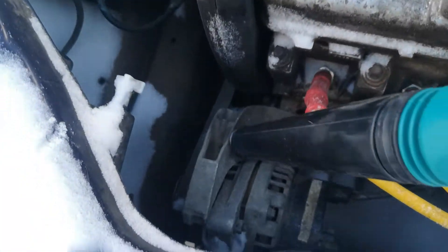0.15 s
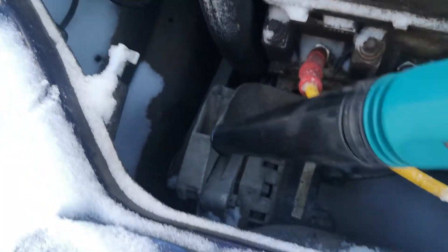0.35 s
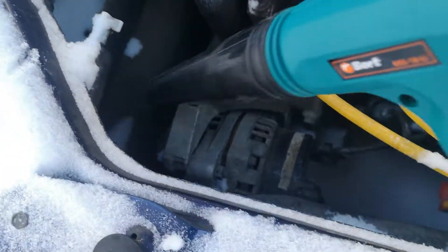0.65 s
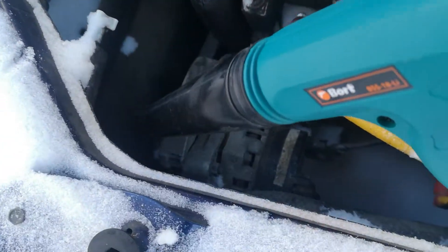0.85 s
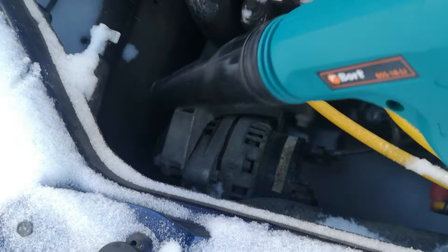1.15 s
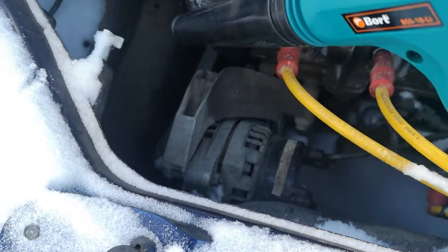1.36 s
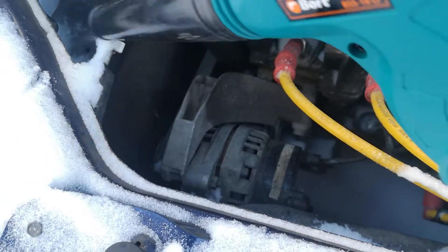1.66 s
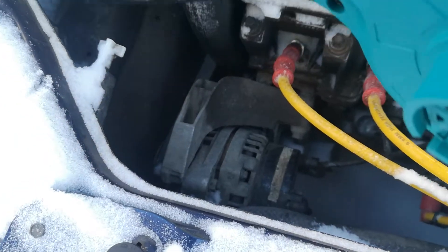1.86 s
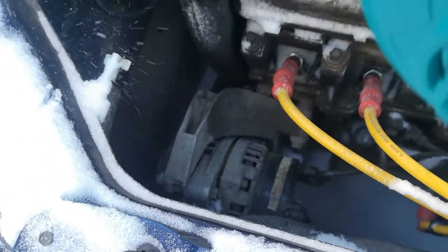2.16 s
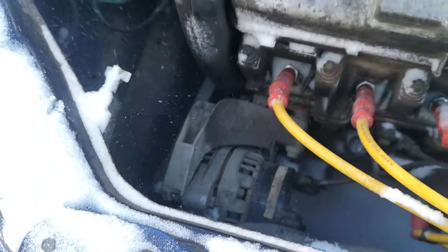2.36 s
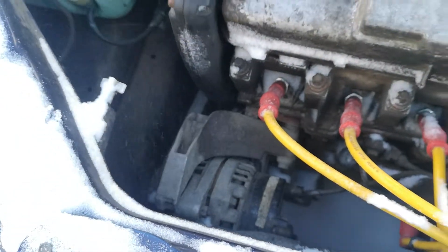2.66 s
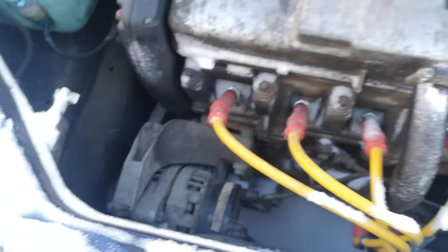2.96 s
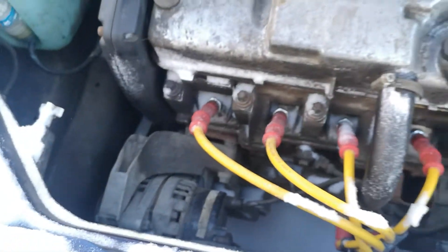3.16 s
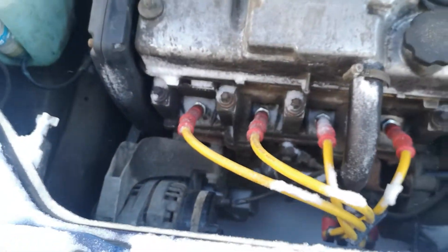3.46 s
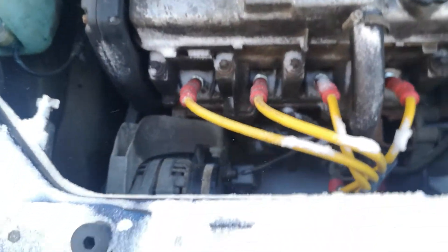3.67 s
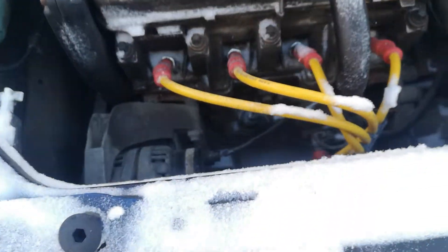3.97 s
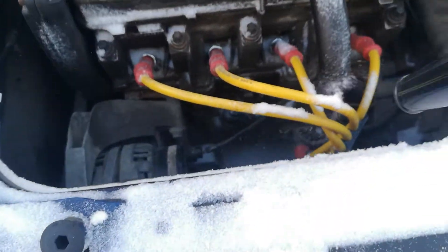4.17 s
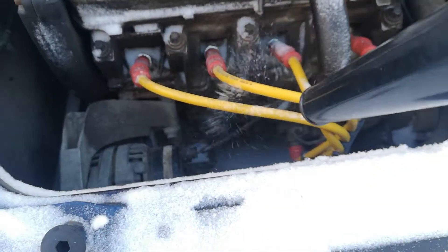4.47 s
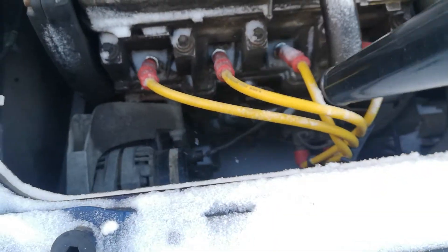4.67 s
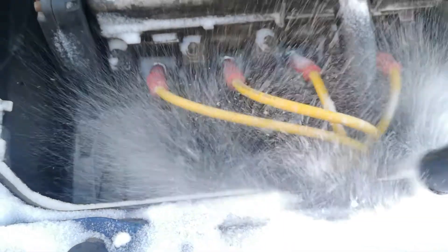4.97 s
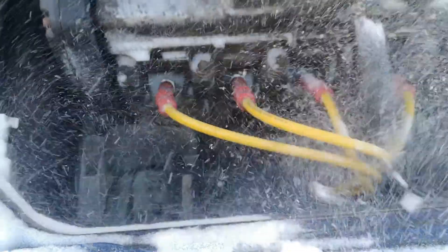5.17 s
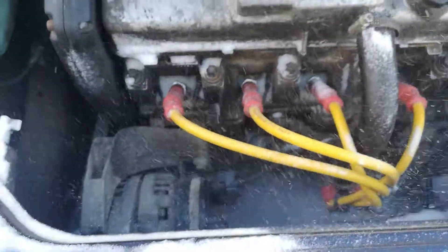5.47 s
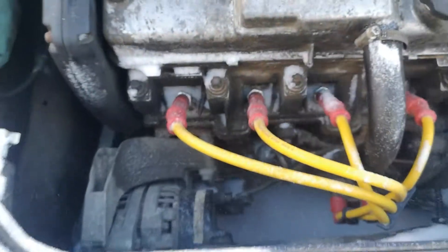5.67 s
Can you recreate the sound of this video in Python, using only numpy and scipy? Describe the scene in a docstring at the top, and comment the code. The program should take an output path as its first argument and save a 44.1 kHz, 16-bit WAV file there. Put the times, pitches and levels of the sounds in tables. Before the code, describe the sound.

A cordless handheld blower roars close up over a snowy engine bay, motor whine steady around loud hissing air, then sinks in pitch as it is released.

```python
"""Cordless blower over an engine bay

A nine-blade blower is swept over a snowy engine bay, close to a stereo microphone pair.
Sines at multiples of the shaft rate make hum and blade whine; coloured noise makes the air's roar and hiss.
A gap in the jet's way sounds hollow and briefly whistles; stray air buffets the microphones.
Near the end the trigger is let go: friction and air drag run the fan down, its whine ringing tube resonances."""
import sys
import numpy as np
from scipy import signal
from scipy.fft import rfft, irfft, next_fast_len
from scipy.io import wavfile

SR = 44100
rng = np.random.default_rng(int(sys.argv[2]) if len(sys.argv) > 2 else 0)


def inscribe(sig):
    """Save sig as 16-bit PCM at rate SR to the path in sys.argv[1].

    A 1-D sig is mono; a 2-D sig holds one channel per row.
    Samples are clipped to [-1, 1] before scaling.
    """
    pcm = np.round(np.clip(np.atleast_2d(sig).T, -1, 1) * 32767)
    wavfile.write(sys.argv[1], SR, pcm.astype(np.int16))


N = 257544

BLADES, FULL_SPEED_REV_S = 9, 277
RELEASE_S, FRICTION_PER_S, AIR_DRAG_PER_REV = 4.985, .3, .00143
# dB lost per tenfold drop in speed; AIR for housing and bright hiss
HUM_FALL_DB, ORDER_FALL_DB, AIR_FALL_DB = 135, 60, 39
WHINE_WIDTH_HZ = 60  # resonance width of the steady whine
HANDOVER_HZ = 25  # fall in pitch over which the tube resonances take over
LEFT_LAG_S, CUTOFF_HZ = .000533, 15150
ECHO_BAND_HZ = [1100, 4500]  # longer waves pass round the obstacles, shorter ones scatter
AIR_TRIM_DB = -0.52  # on the airflow and its reflections

# Balance is left-right; lag is of the left side. Airflow levels are before AIR_TRIM_DB and reflections.
# Microphone pair: f/Hz, likeness/0-1, balance/dB, lag beyond LEFT_LAG_S/rad
PAIR = [(30, 1, 0, -0.043), (151, 0.95, -0.3, -0.34), (337, 0.87, 1, 0.68), (607, 0.83, -6.5, 0.96),
        (850, 0.9, -6.5, 0.45), (1200, 0.49, -1, -0.8), (1750, 0.67, -1.5, 0.091), (2707, 1, -1.5, -0.11),
        (3030, 0.86, 6, -0.3), (5050, 0.5, -2, 0.23), (5760, 0, 1, -1.3), (6960, 0.59, 1, -2.06),
        (8200, 0.97, -1, -1.7), (9240, 0.26, 5.5, -1.56), (12000, 0.35, 3.5, -0.89)]
# Sweep of the blower: t/s, bearing as balance/dB, jet strength/dB, housing roar/dB, bright hiss/dB
SWEEP = [(0, -7.5, 4, -18, -27.5), (.45, -4, 0, -19, -25.5), (.75, -7, -1, -17, -22.5),
         (1.2, -8, -1, -17, -25), (1.6, -5.5, 0.5, -19.5, -25), (1.95, -11.5, 1.5, -19.5, -25.5),
         (2.3, -15, 2, -18.5, -24.5), (2.65, -8.5, 0.5, -18, -22.5), (2.9, -4.5, 1, -21, -23.5),
         (3.12, -0.5, -1.5, -18.5, -20), (3.36, -2, -1.5, -17.5, -18), (3.62, -8, 0, -22, -20),
         (3.84, 4.5, -1.5, -16.5, -22), (4.08, 6.5, -1, -17, -20.5), (4.6, 6.5, 0.5, -16, -23),
         (5, 1, 2.5, -16.5, -25.5), (5.2, 0, 2, -14.5, -26.5), (5.5, -0.5, 0.5, -14.5, -24.5),
         (5.84, -12, 0, -21, -28.5)]
# Shaft hum at full speed: t/s, level/dB
HUM = [(0, -30.5), (2.5, -30.5), (4, -28.5), (5, -28.5), (5.35, -23), (5.5, -29), (5.84, -30)]
# Blade whine at full speed: t/s, level/dB, balance/dB, lag/rad
WHINE = [(0, -30, 0, 3), (.25, -30, -6, 2.3), (.55, -26, -3, 2.5), (.72, -30, -2, 2.1), (.9, -25, -8, 1.9),
         (1.15, -27, -9, 1.7), (1.3, -24, -8, 1.7), (1.62, -22, -9, 1.8), (1.8, -27, -5, 2),
         (2.05, -30, -3, 3), (2.2, -24.5, -12, 2.3), (2.35, -28, -14, 2.4), (2.55, -26, -20, 1.5),
         (2.85, -26.5, -10, 2.5), (3.1, -28, -12, 2.9), (3.55, -28.5, -7, 2.8), (3.7, -35, -4, 2.5),
         (4.0, -25, 8, 2.1), (4.13, -24, 9, 2.8), (4.3, -25.5, 3, 3.14), (4.45, -27, 1, 3.14),
         (4.8, -23.5, 3, 3.14), (4.97, -22.5, 8, 4.8)]
# Tube resonances rung by the sinking whine: f/Hz, width/Hz, level/dB, balance/dB, lag/rad
TUBE = [(2455, 50, -21, 12, .7), (2345, 50, -17.5, 4, -.5), (2295, 35, -25, 1, -.7),
        (2160, 40, -21, -5, .8), (2105, 95, -20.5, -1, .4), (1965, 60, -21.5, 7, -.1),
        (1890, 70, -14.8, -1.5, -.5), (1790, 70, -27.5, -8, -.7), (1675, 70, -25, 2, -1.2),
        (1610, 48, -16.5, -11, -.8), (1545, 80, -31.5, 1, -1.3)]
# Fainter rotor and motor tones: multiple of shaft rate/1, level at full speed/dB, balance/dB
ORDERS = [(2, -40.5, -6), (3, -42, -7), (4, -42.5, -3), (8, -39.5, -1), (10, -35.5, -1), (15, -47, -1),
          (18, -40, -2), (27, -46, -4)]

# Noise spectra, relative: f/Hz, level per Hz/dB
RUSH_SPECTRUM = [(120, -21), (220, -8.5), (350, -5.5), (550, 0.5), (700, -2), (850, -0.5), (1050, 0),
                 (1300, -8), (1450, -5), (1700, -20)]
HISS_SPECTRUM = [(2700, 2), (3100, 5), (3400, 4), (3800, 4), (4200, -0.5), (5100, -12.5), (6400, -3),
                 (7000, -4), (7600, -36)]
TOP_SPECTRUM = [(8500, 8), (9300, 7), (10000, -1), (10500, -0.5), (11500, -5), (12500, -4.5),
                (15000, -12.5), (16000, -18)]
BUFFET_SPECTRUM = [(15, 7), (25, -0.5), (45, 3), (70, -5), (100, -4.5)]
FLUTTER_SPECTRUM = [(80, -6), (120, -1.5), (200, -1.5), (350, 1), (420, -5)]
# Noise resonances, relative: f/Hz, width/Hz, level/dB
LOWER_GAP_MODES = [(1135, 90, -3), (1235, 100, 0)]
UPPER_GAP_MODES = [(1355, 110, 0), (1445, 110, -3)]
EDGE_MODES = [(1616, 300, -0.5)]
METAL_MODES = [(1970, 540, 0.24), (2048, 340, 0.0032), (2230, 160, -1.3)]
HOUSING_MODES = [(2475, 320, -1.7), (2664, 740, 0.5), (2738, 305, 1.4)]
LOW_RING_MODES = [(4498, 440, 4), (4850, 250, -1)]
HIGH_RING_MODES = [(5515, 1380, 3), (5800, 210, -4)]
BRIGHT_MODES = [(7360, 1450, 2), (7470, 400, 0.5), (7803, 470, 2.5)]
UPPER_BRIGHT_MODES = [(8410, 730, 0), (8750, 500, -2)]

# Air parts that follow the jet: level/dB, share of jet swing/1, share of bright-hiss swing/1,
# loss per tenfold drop in speed/dB, balance/dB, share of bearing/1
RUSH_PART = (-26.5, 1, 0.5, 11, -1, -0.07)
METAL_PART = (-23.5, 0.52, 0.34, 24, 2, 0.43)
HISS_PART = (-24, 1.3, 0.18, 34, -4.5, 0.35)
TOP_PART = (-32, 1.5, 0.9, 24, -2, 0.17)
# Jet across a gap: t/s, lower resonance level/dB, upper resonance level/dB
HOLLOW = [(0, -27, -26), (.18, -25, -25.5), (.33, -27, -23), (.4, -28, -25), (.52, -31, -24),
          (.63, -35, -26), (.71, -44, -45), (1.3, -42, -60), (1.6, -35, -60), (2.2, -33, -60),
          (2.6, -42, -60), (3, -34, -60), (3.5, -33, -60), (3.8, -44, -60), (4.8, -42, -60), (5, -37, -60),
          (5.2, -42, -60), (5.84, -44, -60)]
# Low edge of the roar: t/s, level/dB, balance/dB
EDGE = [(0, -22.5, 12), (.5, -23, 6), (.72, -30.5, 9), (1.45, -29.5, 3), (1.7, -25, -3), (2.4, -29, -16),
        (2.65, -21.5, -13), (2.9, -27.5, 6), (3.3, -25, -4), (3.6, -22.5, -5), (3.85, -34, -14),
        (4.8, -32, -30), (5.3, -42, -6), (5.84, -34, 5)]
# Two ringing bands in the hiss: t/s, low level/dB, low balance/dB, high level/dB, high balance/dB
RINGS = [(0, -24, -3, -26, -1), (.5, -30, -6, -27, -0.5), (1.15, -32.5, -7, -27.5, -6),
         (1.45, -27.5, -7, -25, 1), (1.9, -26.5, -11, -27.5, -2), (2.25, -25.5, -3, -24, -7),
         (2.5, -32, 7, -28, -6), (2.9, -27.5, -1, -25, 1), (3.4, -28, 13, -23.5, -4),
         (3.85, -34, -10, -24, -6), (4.1, -26, -5, -28, 2), (4.4, -28.5, -1, -27, 1),
         (4.85, -30, 2, -25, 1), (5.1, -28, 4, -24.5, -3), (5.5, -30.5, -2, -33.5, -2),
         (5.84, -39.5, -16, -37, -7)]
# Bright hiss: t/s, balance/dB
BRIGHT_PAN = [(0, -6), (.65, 1), (1, -5), (1.5, -3), (2.1, -6.5), (2.6, -7), (3.2, 1), (3.45, -6),
              (3.7, -8), (4.1, -3), (4.45, -8), (4.75, -4), (5.2, 1), (5.84, -9)]
# Top of the bright hiss: t/s, level/dB, balance/dB
UPPER_BRIGHT = [(0, -30, 0), (.6, -34, -3), (1.5, -34, -8), (2.2, -35, -11), (2.68, -31, -8), (2.9, -34, 0),
                (3.03, -28, -5), (3.12, -33, 0), (3.27, -34, 6), (3.6, -36, 0), (3.87, -34, -7),
                (4, -25, 0), (4.4, -27.5, -3), (5, -30.5, 0), (5.3, -32, 0), (5.84, -44, 0)]
# Reflections in nozzle tube and off bay walls: delay/s, level/dB, spread of delay drift/s
ECHOES = [(.00431, -12, .00003), (.0087, -16, .0001), (.0017, -15, .0001)]
# Buffeting of the microphones: t/s, deep thump level/dB, faster flutter level/dB
BUFFETING = [(0, -39.5, -49), (.5, -43.5, -42.5), (1.1, -44, -36.5), (1.9, -43, -40), (2.65, -43, -36.5),
             (2.9, -43, -41), (3.4, -41, -31.5), (3.85, -45, -41.5), (4.08, -41, -36.5), (4.35, -46, -45),
             (4.85, -49, -44), (5.05, -41, -38.5), (5.4, -38, -34), (5.84, -40, -35)]
# Whistle of the gap: t/s, f/Hz, level/dB
WHISTLE = [(0, 1375, -70), (.385, 1375, -45), (.415, 1372, -18.5), (.445, 1368, -18), (.465, 1370, -28),
           (.49, 1380, -24), (.53, 1335, -26), (.58, 1325, -34), (.66, 1325, -60)]


def from_db(db):
    """Decibels to gain."""
    return np.exp(np.asarray(db) * np.log(10) / 20)


def rms_one(x):
    """Scale to rms 1 over all samples."""
    return x / np.sqrt(np.mean(x ** 2) + 1e-20)


def in_time(rows):
    """Table columns as curves, one value a sample."""
    t_s, *columns = np.transpose(rows)
    return [np.interp(np.arange(N) / SR, t_s, column) for column in columns]


def at_hz(rows, hz):
    """Table columns read on a log-frequency axis."""
    table_hz, *columns = np.transpose(rows)
    return [np.interp(np.log(hz + 1e-9), np.log(table_hz), column) for column in columns]


def drift(rate_hz):
    """Slow chance of spread 1: noise through two one-pole low-passes, run every 40th sample."""
    step = 40
    pole = np.exp(-2 * np.pi * rate_hz * step / SR)
    noise = rng.standard_normal(N // step + 2002)
    slow = signal.lfilter([1], [1, -2 * pole, pole * pole], noise)[2000:]  # settled part
    return np.interp(np.arange(N) / step, np.arange(len(slow)), rms_one(slow))


def placed(level_db, pan_db):
    """Left and right gains of a mean level and a left-right balance."""
    ratio = from_db(pan_db)
    right = from_db(level_db) * np.sqrt(2 / (1 + ratio ** 2))
    return np.array([ratio * right, right])


def left_lag_rad(hz):
    """Phase by which the left side hears a frequency late."""
    return 2 * np.pi * hz * LEFT_LAG_S + at_hz(PAIR, hz)[2]


# The pair's response per FFT bin
SIZE = next_fast_len(N)
BINS_HZ = np.arange(SIZE // 2 + 1) * SR / SIZE
ALIKE = np.clip(at_hz(PAIR, BINS_HZ)[0], 0, 1)
TILT = placed(0, at_hz(PAIR, BINS_HZ)[1])
LATE = np.exp(-1j * left_lag_rad(BINS_HZ))


def sloped(spectrum):
    """Gain per bin of a spectrum that is closed at both ends."""
    inside = (BINS_HZ > spectrum[0][0]) & (BINS_HZ < spectrum[-1][0])
    return from_db(at_hz(spectrum, BINS_HZ)[0]) * inside


def resonant(modes):
    """Gain per bin of noise sent twice through each resonance; powers add."""
    power = 0
    for centre_hz, width_hz, db in modes:
        detuning = 2 * (BINS_HZ - centre_hz) / width_hz
        power = power + (from_db(db) / (1 + detuning ** 2)) ** 2
    return np.sqrt(power)


def air(gain, gusts, flicker_db, lead_rad=0):
    """Turbulent noise, partly alike at the pair, left side late (less lead_rad); rms 1 over both sides."""
    first, second = rfft(rng.standard_normal((2, SIZE)))
    mixed = ALIKE * first + np.sqrt(1 - ALIKE ** 2) * second
    left = mixed * LATE * np.exp(1j * lead_rad)
    both = irfft(gain * TILT * np.array([left, first]), SIZE)[:, :N]
    return rms_one(both * from_db(flicker_db * (gusts + drift(11.6))))


def tone(turns, order, level_db, pan_db, lag_rad, waver_db):
    """Sine at a multiple of a turning rate, wavering in strength; the left side lags."""
    phase = 2 * np.pi * order * turns + rng.uniform(0, 2 * np.pi)
    sides = np.array([np.sin(phase - lag_rad), np.sin(phase)])
    return np.sqrt(2) * sides * placed(level_db + waver_db * drift(8), pan_db)


def shaft_speed():
    """Turns per s: steady, then slowed by friction (with speed) and air drag (speed squared); a slight drift."""
    coasting_s = np.maximum(np.arange(N) / SR - RELEASE_S, 0)
    ratio = AIR_DRAG_PER_REV / FRICTION_PER_S
    speed = 1 / ((1 / FULL_SPEED_REV_S + ratio) * np.exp(FRICTION_PER_S * coasting_s) - ratio)
    return speed + .35 * drift(2.5)


def whine(hz):
    """Blade-tone level, balance, lag: as pitch sinks, the steady whine yields to tube resonances it passes."""
    full_hz = BLADES * FULL_SPEED_REV_S
    steady = (full_hz, WHINE_WIDTH_HZ, *in_time(WHINE))
    sunk = np.clip((full_hz - hz) / HANDOVER_HZ - .5, 0, 1)
    power = pan_sum = lag_sum = 0
    for share, mode in [(1, steady)] + [(sunk, mode) for mode in TUBE]:
        centre_hz, width_hz, db, pan_db, lag_rad = mode
        detuning = 2 * (hz - centre_hz) / width_hz
        part = share * (from_db(db) / (1 + detuning ** 2)) ** 2
        power = power + part
        pan_sum = pan_sum + part * pan_db
        lag_sum = lag_sum + part * lag_rad
    return 10 * np.log10(power), pan_sum / power, lag_sum / power  # power-weighted means


def rotor(speed):
    """Unbalance hums once a turn, each blade passes the outlet lip once a turn; hum and weak multiples fade."""
    turns = np.cumsum(speed) / SR
    slowing = np.log10(speed / FULL_SPEED_REV_S)
    hum_db = in_time(HUM)[0] + HUM_FALL_DB * slowing
    out = tone(turns, 1, hum_db, -0.65, left_lag_rad(speed), waver_db=0.73)
    out += tone(turns, BLADES, *whine(BLADES * speed), waver_db=.9)
    for order, full_db, pan_db in ORDERS:
        level_db = full_db + ORDER_FALL_DB * slowing
        out += tone(turns, order, level_db, pan_db, left_lag_rad(order * speed), waver_db=2)
    return out


def airflow(slowing, bearing_db, jet_db, housing_db, bright_db):
    """Each part of the air path is noise of its own colour; what leaves the nozzle shares the same gusts."""
    gusts = .5 * drift(4)
    low_ring_db, low_ring_pan_db, high_ring_db, high_ring_pan_db = in_time(RINGS)
    lower_gap_db, upper_gap_db = in_time(HOLLOW)

    def swept(level_db, jet_share, bright_share, fall_db, pan_db, bearing_share):
        """Gains of a part that follows jet, bright hiss, speed and bearing."""
        swing_db = jet_share * jet_db + bright_share * (bright_db - bright_db.mean())
        return placed(level_db + swing_db + fall_db * slowing, pan_db + bearing_share * bearing_db)

    housing = placed(housing_db + AIR_FALL_DB * slowing, bearing_db)
    bright = placed(bright_db + AIR_FALL_DB * slowing, *in_time(BRIGHT_PAN))
    low_ring = placed(low_ring_db, low_ring_pan_db)
    high_ring = placed(high_ring_db, high_ring_pan_db)

    out = swept(*RUSH_PART) * air(sloped(RUSH_SPECTRUM), 0, flicker_db=0.73)
    out += placed(lower_gap_db, 5) * air(resonant(LOWER_GAP_MODES), 0, flicker_db=.5, lead_rad=1.4)
    out += placed(upper_gap_db, -4) * air(resonant(UPPER_GAP_MODES), 0, flicker_db=.5, lead_rad=2.9)
    out += placed(*in_time(EDGE)) * air(resonant(EDGE_MODES), 0, flicker_db=1.8)
    out += swept(*METAL_PART) * air(resonant(METAL_MODES), 0, flicker_db=-0.97)
    out += housing * air(resonant(HOUSING_MODES), 0, flicker_db=.8)
    out += swept(*HISS_PART) * air(sloped(HISS_SPECTRUM), gusts, flicker_db=0.5)
    out += low_ring * air(resonant(LOW_RING_MODES), gusts, flicker_db=1.2)
    out += high_ring * air(resonant(HIGH_RING_MODES), gusts, flicker_db=1.33)
    out += bright * air(resonant(BRIGHT_MODES), gusts, flicker_db=0.7)
    out += placed(*in_time(UPPER_BRIGHT)) * air(resonant(UPPER_BRIGHT_MODES), gusts, flicker_db=2.5)
    out += swept(*TOP_PART) * air(sloped(TOP_SPECTRUM), gusts, flicker_db=1.0)
    return out


def reflected(x):
    """Airflow returns a few ms late; delays hardly move, so ridges stand in the noise and slide slowly."""
    out, at = x.copy(), np.arange(N)
    band = signal.butter(1, ECHO_BAND_HZ, "band", fs=SR, output="sos")
    returning = signal.sosfilt(band, x)
    for delay_s, db, move_s in ECHOES:
        late_samples = (delay_s + move_s * drift(.5)) * SR
        echo = np.array([np.interp(at - late_samples, at, side, left=0) for side in returning])
        out += from_db(db) * echo
    return out


def buffeting():
    """Stray air thumps and flutters on the microphones: two bands of low noise."""
    deep_db, flutter_db = in_time(BUFFETING)
    deep = from_db(deep_db) * air(sloped(BUFFET_SPECTRUM), 0, flicker_db=3.0)
    flutter = from_db(flutter_db) * air(sloped(FLUTTER_SPECTRUM), 0, flicker_db=3.0)
    return deep + flutter


def whistle():
    """A near-pure tone from the gap, gliding in pitch."""
    hz, db = in_time(WHISTLE)
    return tone(np.cumsum(hz) / SR, 1, db, -4, left_lag_rad(hz) - 2.9, waver_db=1)


def scene():
    """Rotor tones and whistle over the moving air, its reflections and the buffeting."""
    speed = shaft_speed()
    slowing = np.log10(speed / FULL_SPEED_REV_S)
    moving_air = from_db(AIR_TRIM_DB) * reflected(airflow(slowing, *in_time(SWEEP)))
    return rotor(speed) + moving_air + buffeting() + whistle()


def record(dry):
    """Peaks are rounded near full scale, the top is cut steeply."""
    rounded = dry / (1 + np.abs(dry / .97) ** 6) ** (1 / 6)
    low_pass = signal.ellip(16, .5, 90, CUTOFF_HZ, fs=SR, output="sos")
    return signal.sosfilt(low_pass, rounded)


dry = scene()
out = record(dry)
inscribe(out)
```